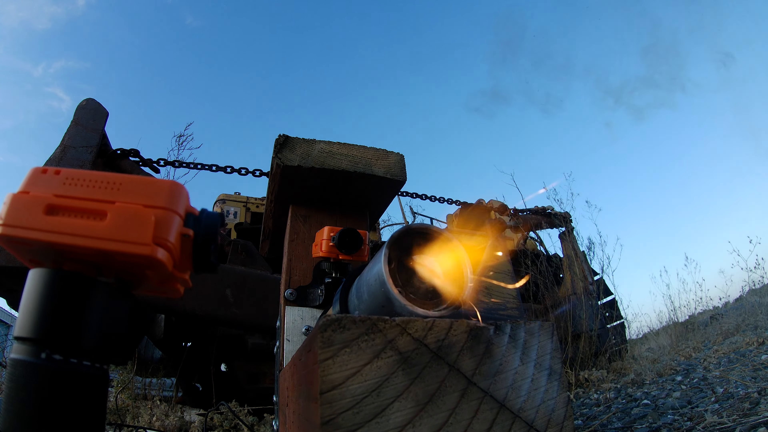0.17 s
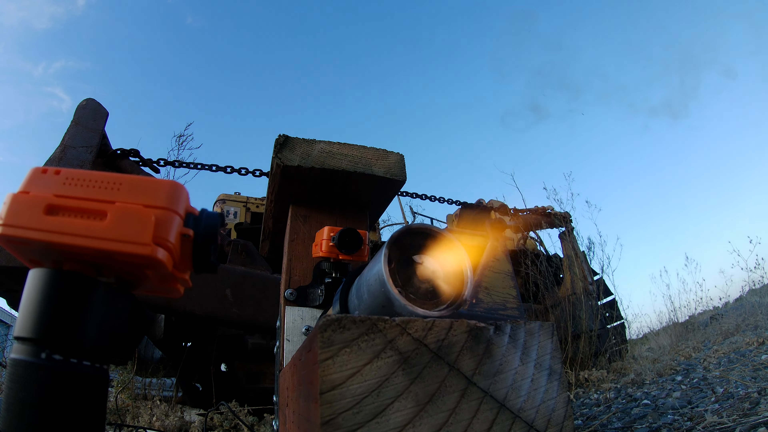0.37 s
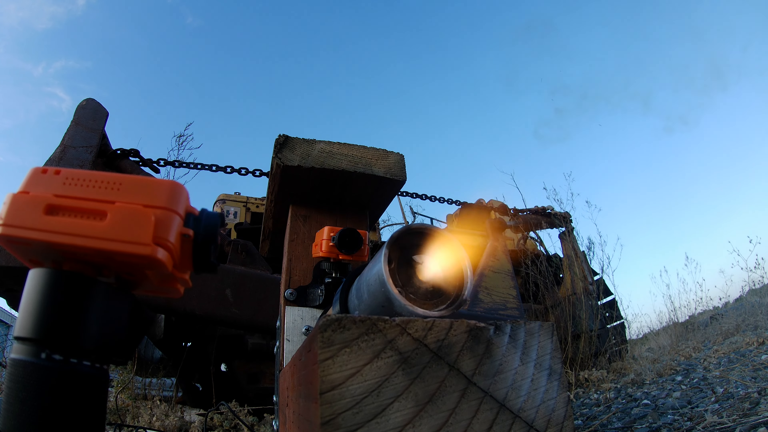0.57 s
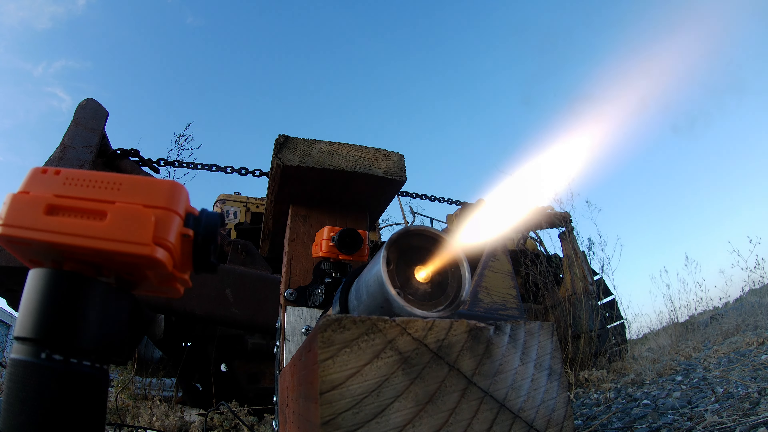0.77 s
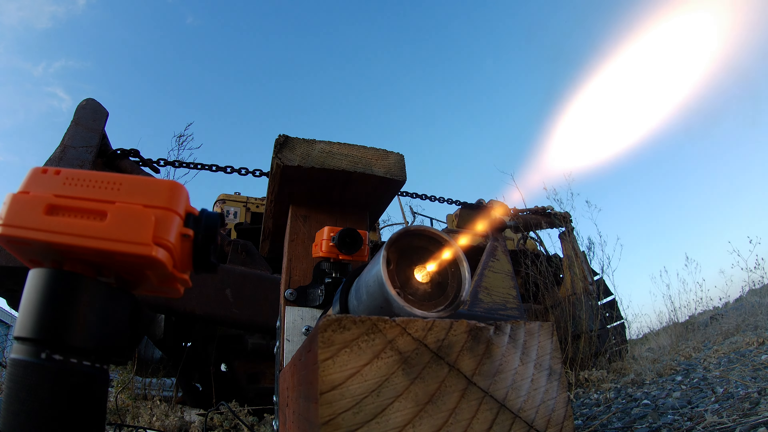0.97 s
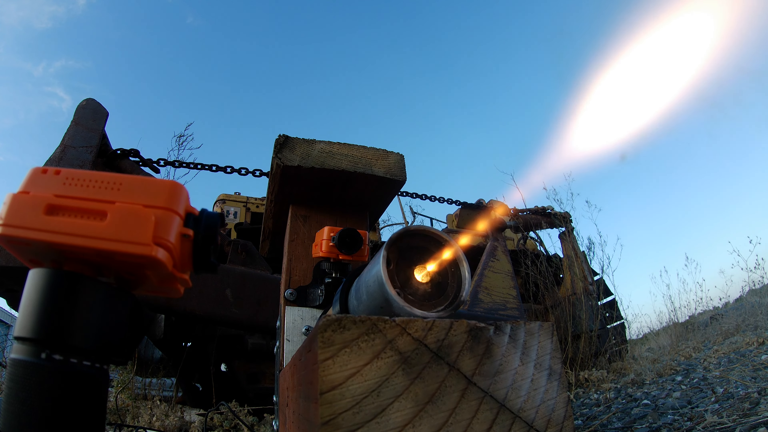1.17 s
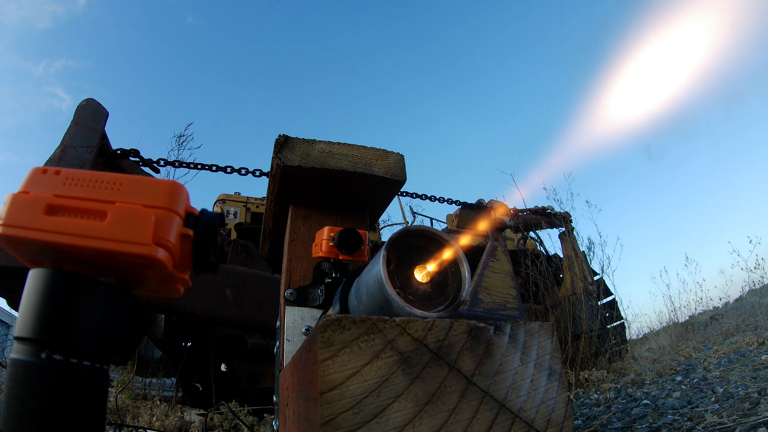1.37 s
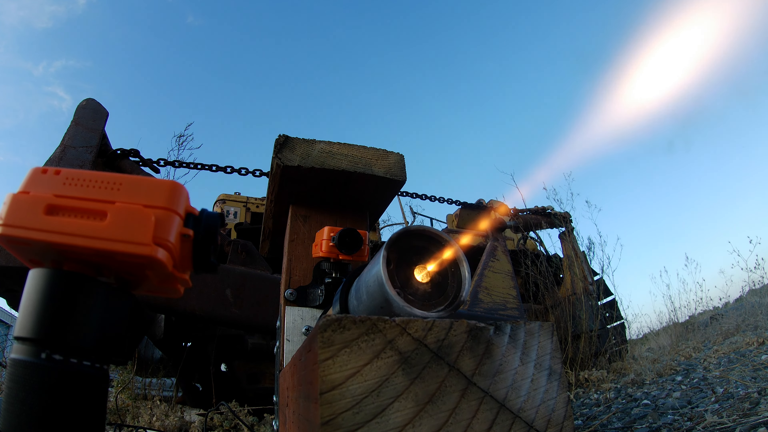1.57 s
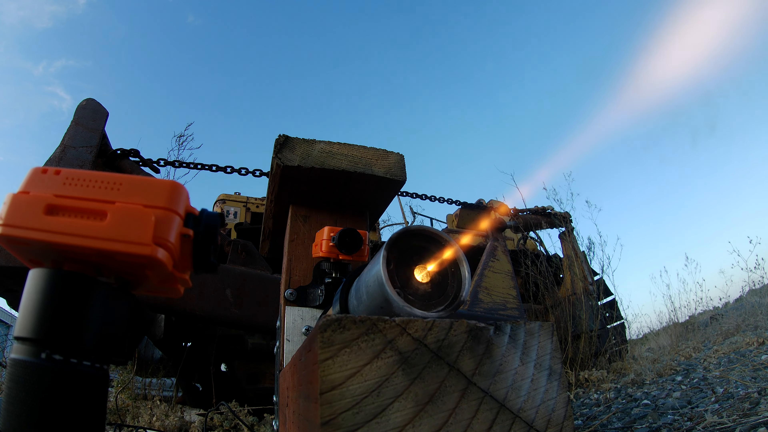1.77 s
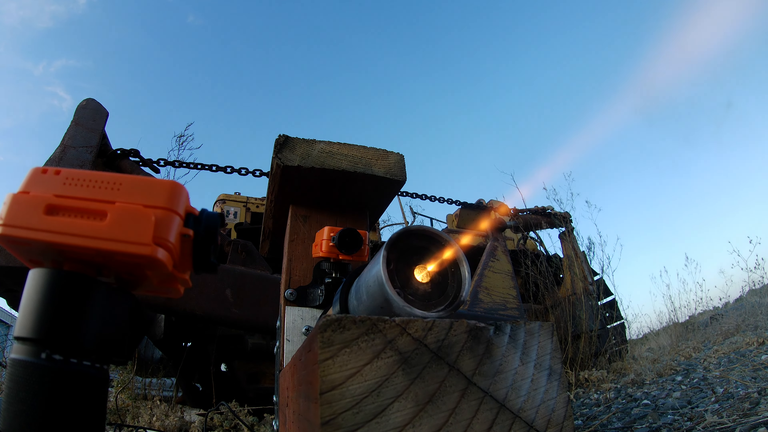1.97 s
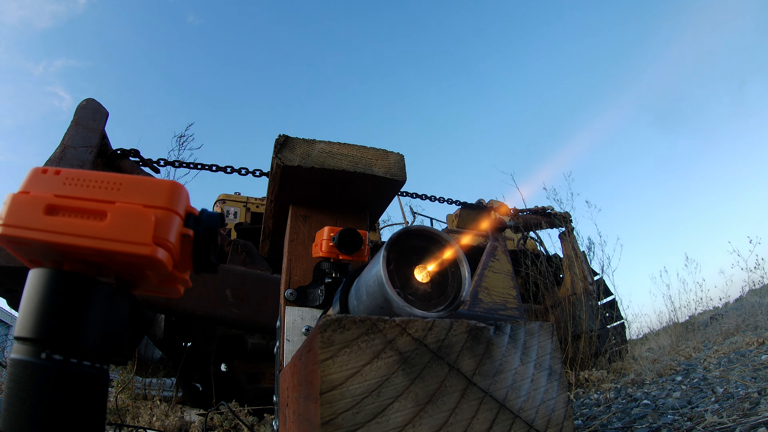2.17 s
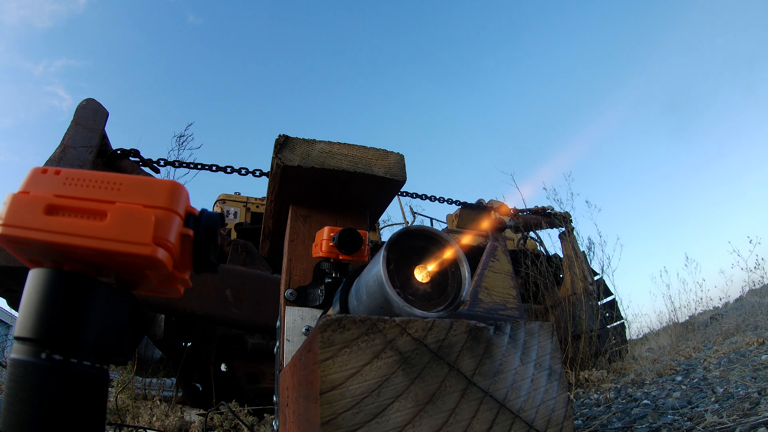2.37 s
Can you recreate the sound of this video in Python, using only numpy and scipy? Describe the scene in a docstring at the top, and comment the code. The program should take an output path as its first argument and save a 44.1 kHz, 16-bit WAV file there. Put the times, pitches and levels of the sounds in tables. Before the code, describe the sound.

Small rocket motor lights with a fluttering, popping flame, then thumps into a steady jet roar

```python
"""Small rocket motor on a stand

Outdoors, microphones close by. First the igniter flame flutters and chuffs out of the steel tube, with
a few sparks; the chamber comes up to pressure with a thump and a fast jet roars on steadily.
Flame and jet are stereo noise with one-sided pressure dips, shaped by a spectrum and level curves;
chuffs are level dips ending in pulses, sparks are decaying noise, the thump is a push and a suction.
"""
import sys
import numpy as np
from scipy import signal
from scipy.fft import rfft, irfft
from scipy.io import wavfile
from scipy.ndimage import uniform_filter1d, map_coordinates

SR = 44100
rng = np.random.default_rng(int(sys.argv[2]) if len(sys.argv) > 2 else 0)


def volts(x):
    """Linear amplitude factor 10**(x/20) for a level x in dB, scalar or array-like."""
    e = np.asarray(x, float) / 20
    return 10 ** e


def generate_wav(sig):
    """Save sig (samples, or channels by samples) to the path in sys.argv[1] as 16-bit PCM at SR."""
    pcm = np.round(np.clip(np.atleast_2d(sig).T, -1, 1) * 32767).astype(np.int16)
    wavfile.write(sys.argv[1], SR, pcm)


N = 111132
TIME = np.arange(N) / SR  # s

# The jet's course before it heaves: t/s, roar level/dB, hiss level/dB
JET_COURSE = [(.3, -100, -100), (.5, -70, -69), (.59, -63, -62), (.63, -44, -44.5), (.68, -29, -42.5),
              (.72, -26.5, -41), (.75, -25.5, -36.5), (.77, -38, -37), (.785, -28.5, -46), (.82, -31, -39),
              (.86, -28, -37.5), (.92, -26.5, -37.5), (1.1, -26.5, -36), (1.4, -26, -35.5), (1.7, -27, -36),
              (1.9, -25.5, -35.5), (2.05, -26.5, -35), (2.15, -25.5, -35.5), (2.3, -27, -36),
              (2.52, -26.5, -35.5)]
# Relative spectrum of the exhaust plume: f/Hz, density/dB per Hz
PLUME_SPECTRUM = [(12, -30), (20, 0.5), (53, -1), (109, 1), (260, -3), (480, -2.5), (1000, -2.5),
                  (1820, -8), (2610, -12), (4950, -20.5), (8000, -27.5), (11500, -31.5), (12600, -34.5),
                  (13700, -31), (14700, -42), (15600, -33)]
# Likeness of left and right in the jet: f/Hz, correlation/1
JET_LIKENESS = [(60, 0.88), (180, 0.82), (550, 0.86), (1650, 0.9), (4970, 0.83), (15000, 0.74)]
JET_LAG_S, HISS_HZ = 8e-6, 3000  # the left side hears the jet later; edge of the hiss

# The pressure wave: onset, level, time constants of push, then time after onset, width and share of suction
THUMP_S, THUMP_DB, RISE_S, FALL_S = .7665, -14.5, .0005, .013
SUCK_S, SUCK_WIDE_S, SUCK = .05, .022, .33

# The lazy flame before flutter: t/s, level/dB, brightness above the first notch/dB, bass gain/dB
FLAME_COURSE = [(0, -37.5, -8.5, 3), (.06, -34, -10, 1), (.12, -29.5, -7.5, -0.5), (.2, -29.5, -4.5, 2),
                (.28, -27.5, -3.5, 2), (.32, -22, -2, -3.5), (.38, -24, -0.5, -2.5), (.41, -21, -4.5, -2),
                (.44, -21.5, 2.5, -2), (.48, -19.5, -1.5, 2), (.53, -20, 2, -2), (.56, -21, 2.5, 2.5),
                (.6, -19, 0.5, -1.5), (.63, -20.5, 1, -0.5), (.66, -18, 2, -6.5), (.69, -18, 2.5, -3),
                (.72, -21.5, 6.5, -2.5), (.745, -21, 1, -4), (.757, -25, 2, -7), (.77, -25.5, 0, -6),
                (.785, -47, 0, -2), (.8, -80, 0, 0)]
# Relative spectrum of the flame through the tube mouth: f/Hz, density/dB per Hz
TUBE_SPECTRUM = [(15, -44), (25, -19), (45, -13), (100, -9.5), (170, -6), (420, -3.5), (700, -3),
                 (1080, -3), (1300, -10), (1600, -18), (2100, -29.5), (2400, -21.5), (2700, -21.5),
                 (3050, -28.5), (3500, -23.5), (4100, -44), (4450, -34.5), (4800, -30), (5200, -39),
                 (5650, -47), (6200, -40), (6700, -43), (7200, -66), (7800, -56), (8600, -57), (9200, -59),
                 (9800, -54), (10500, -59), (11600, -51), (12600, -57), (13800, -64), (15600, -62.5)]
# Likeness of left and right in the flame: f/Hz, correlation/1
FLAME_LIKENESS = [(60, 1), (200, 1), (900, .9997), (2400, 0.96), (6000, 0.83), (15000, .66)]
# The flame chokes, then relights with a pop: relight t/s, choke length/s, choke depth/dB, pop level/dB
CHUFF_EVENTS = [(.3212, .006, 12, -11), (.3422, .013, 20, -12), (.3605, .009, 20, -13),
                (.397, .003, 6, -12), (.4068, .003, 4, -13), (.4243, .002, 4, -13), (.4487, .014, 9, -13),
                (.4727, .005, 14, -11), (.491, .002, 4, -13), (.561, .004, 10, -19), (.5865, .004, 12, -18),
                (.646, .011, 12, -16), (.674, .007, 13, -16), (.7215, .004, 16, -18)]
NOTCH_HZ, TOP_NOTCH_HZ, BODY_HZ = 2020, 7200, 500
TREBLE_GROWS = 1.7  # brightness in the top band, dB per dB in the band below
POPPING_FROM_DB, POPPING_PER_DB = -30, 0.02  # above this level the flame breaks into one-sided puffs
POP_S, AFTERPUSH, AFTERPUSH_S = .00045, .22, .004  # pop width; push after it: share, time to its peak

# Sparks spit out: t/s, level before filtering/dB
SPARK_EVENTS = [(.408, -44), (.475, -44), (.5035, -42), (.576, -50), (.636, -46)]
SPARK_S = .0005  # decay time constant

UP_CLIP, DOWN_CLIP, HARD = 0.21, 0.27, 7.1  # microphone ceilings above and below zero; knee sharpness


def unit(x):
    """Scaled to rms 1."""
    return x / np.sqrt(np.mean(x ** 2) + 1e-20)


def along(points, hz):
    """Values of (f/Hz, value) points read along a log frequency axis."""
    f, value = np.transpose(points)
    return np.interp(np.log(hz + 1), np.log(f + 1), value)


def curves(rows):
    """One value per sample for each column after the time."""
    s, *columns = np.transpose(rows)
    return [np.interp(TIME, s, column) for column in columns]


def wobble(rate):
    """A smooth random curve, rate knots a second."""
    knots = rng.standard_normal(int(N * rate / SR) + 4)
    return map_coordinates(knots, [TIME * rate])


def filtered(x, response):
    """x times a response of frequency, circular in time."""
    return irfft(rfft(x) * response(np.fft.rfftfreq(N, 1 / SR)), N)


def above(hz, edge_hz):
    """Soft step from 0 to 1 at the edge."""
    return 1 / (1 + (edge_hz / (hz + 1)) ** 12)


def eddies(spectrum, likeness, lag_s, per_s, share):
    """Stereo turbulence of rms 1: noise with a power share of random one-sided pressure dips in its mid."""
    dips = (rng.random(N) < per_s / SR) * rng.exponential(1, N)
    pair = rng.standard_normal((2, N))
    share = np.clip(share, 0, 1)
    pair[0] = np.sqrt(1 - share) * pair[0] - np.sqrt(share) * unit(dips - dips.mean())

    def mid_side(hz):
        # half the angle whose cosine is the left-right correlation
        turn = np.arccos(np.clip(along(likeness, hz), -1, 1)) / 2
        return volts(along(spectrum, hz)) * [np.cos(turn), np.sin(turn)]

    def lag(hz):
        # half the lag on each side: left later, right earlier
        return np.exp(1j * np.pi * lag_s * np.outer([-1, 1], hz))

    mid, side = filtered(pair, mid_side)
    return unit(filtered(np.array([mid + side, mid - side]), lag))


def jet():
    """Plume turbulence split into nozzle hiss and roar; both swell by their own curves and heave a little."""
    roar_db, hiss_db = curves(JET_COURSE)
    gas = eddies(PLUME_SPECTRUM, JET_LIKENESS, JET_LAG_S, per_s=6000, share=0.26)
    hiss = filtered(gas, lambda hz: above(hz, HISS_HZ) ** .25)  # the root makes the slope gentle
    low = filtered(gas, lambda hz: 1 - above(hz, 90))
    shared_db = 0.4 * wobble(9.33) + 0.39 * wobble(45.13)
    roar_gain = volts(roar_db + 0.25 * wobble(7.3))
    heaving_low = volts(2.1 * wobble(8.52) - .4) * low
    roar = roar_gain * (gas - hiss - low + heaving_low)
    hiss = volts(hiss_db + 0.11 * wobble(11)) * unit(hiss)
    return volts(shared_db) * (roar + hiss)


def thump():
    """The pressure wave of the choking nozzle: a quick push, then a slow suction."""
    t = np.clip(TIME - THUMP_S, 0, None)
    push = np.exp(-t / FALL_S)
    suction = SUCK * np.exp(-.5 * ((t - SUCK_S) / SUCK_WIDE_S) ** 2)
    return volts(THUMP_DB) * (1 - np.exp(-t / RISE_S)) * (push - suction)


def chuffs():
    """Chokes as level dips in dB, and pops: a sharp negative pulse, then a slower positive push."""
    choke_db, pops = np.zeros(N), np.zeros(N)
    for s, choke_s, depth_db, pop_db in CHUFF_EVENTS:
        t = TIME - s
        # full depth halfway to the relight, held until just after it
        choke_db -= depth_db * np.clip(2 * (1 + t / choke_s), 0, 1) * (t < POP_S)
        push = np.clip(t / AFTERPUSH_S, 0, None)
        afterpush = AFTERPUSH * np.e * push * np.exp(-push)
        pops += volts(pop_db) * (afterpush - np.exp(-.5 * (t / POP_S) ** 2))
    return choke_db, filtered(pops, lambda hz: hz / (hz - 40j))  # 40 Hz high-pass


def flame():
    """Turbulence through the tube mouth: level, treble and bass follow curves; it flutters, chokes and pops."""
    level_db, bright_db, bass_db = curves(FLAME_COURSE)
    popping = POPPING_PER_DB * (level_db - POPPING_FROM_DB)
    gas = eddies(TUBE_SPECTRUM, FLAME_LIKENESS, 0, per_s=2000, share=popping)
    upper = filtered(gas, lambda hz: above(hz, NOTCH_HZ))
    top = filtered(gas, lambda hz: above(hz, TOP_NOTCH_HZ))
    bass = filtered(gas, lambda hz: 1 / (1 + (hz / BODY_HZ) ** 4))
    treble = volts(bright_db) * (upper - top) + volts(TREBLE_GROWS * bright_db) * top
    gas = gas - upper + (volts(bass_db) - 1) * bass + treble
    flutter_db = np.clip(TIME / 0.95, .3, 1) * (1.1 * wobble(29.74) + 1.2 * wobble(120.4))
    choke_db, pops = chuffs()
    return volts(level_db + uniform_filter1d(flutter_db + choke_db, size=40)) * gas + pops


def sparks():
    """Tiny bright ticks: noise that starts at once and dies away exponentially."""
    life = np.zeros(N)
    for s, db in SPARK_EVENTS:
        life += volts(db) * np.exp(-np.clip(TIME - s, 0, None) / SPARK_S) * (TIME > s)
    return filtered(life * rng.standard_normal(N), lambda hz: above(hz, 1800) / (1 + 1j * hz / 5000))


def scene():
    """Flame, sparks, jet and thump, faded in over 3 ms."""
    fade_in = np.clip(TIME / .003, 0, 1) ** 2
    return fade_in * (flame() + sparks() + jet() + thump())


def low_pass(x):
    """Removes everything above the highest recorded frequency."""
    return signal.sosfilt(signal.butter(12, 15650, fs=SR, output="sos"), x)


def record(dry):
    """The small microphones round off the peaks, sooner on the pressure side."""
    ceiling = np.where(dry > 0, UP_CLIP, DOWN_CLIP)
    rounded = dry / (1 + np.abs(dry / ceiling) ** HARD) ** (1 / HARD)
    return low_pass(rounded)


dry = scene()
out = record(dry)
generate_wav(out)
```